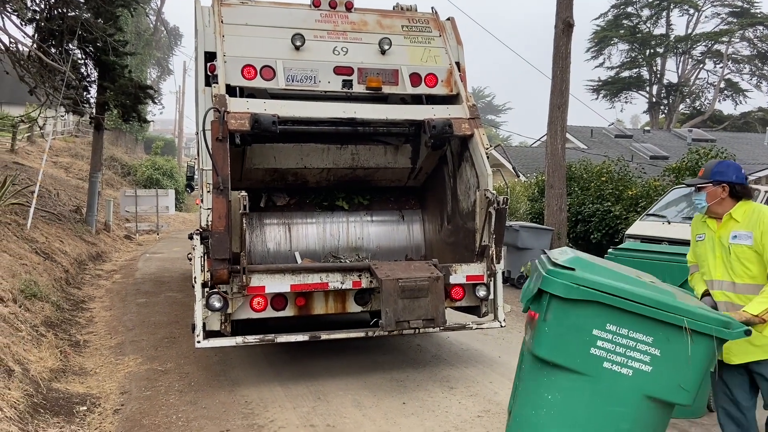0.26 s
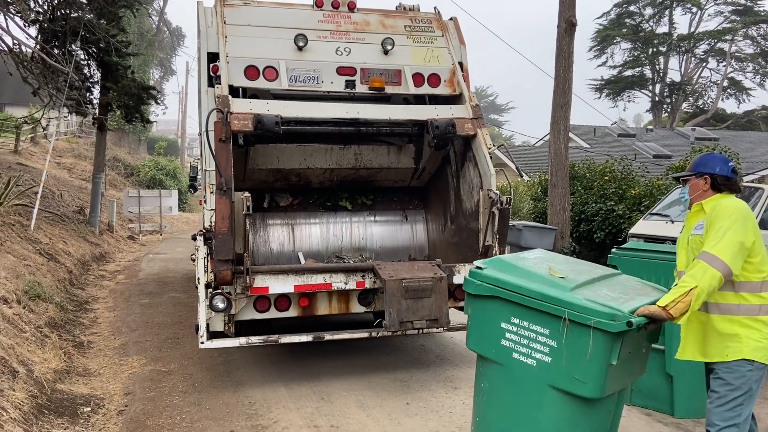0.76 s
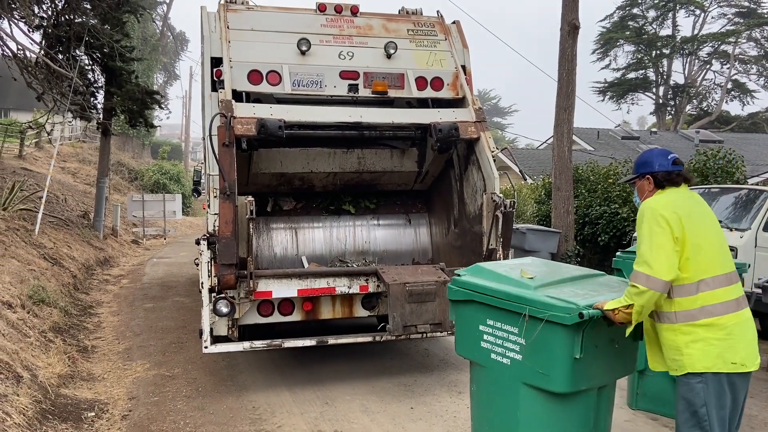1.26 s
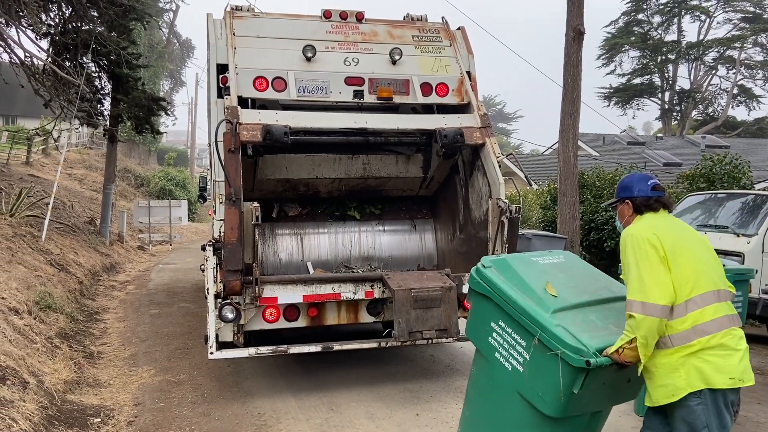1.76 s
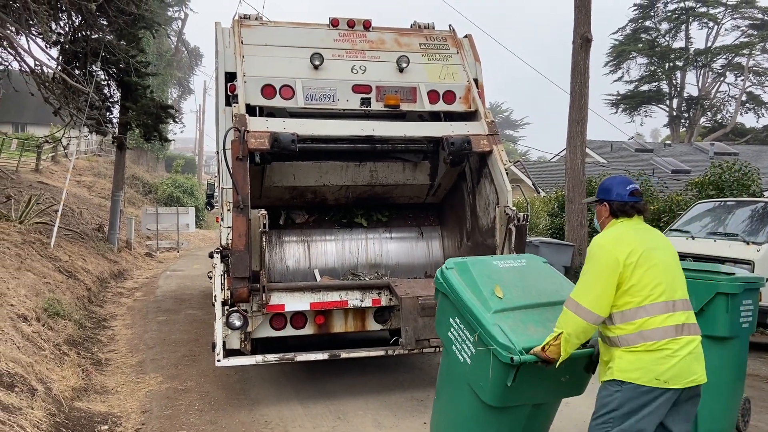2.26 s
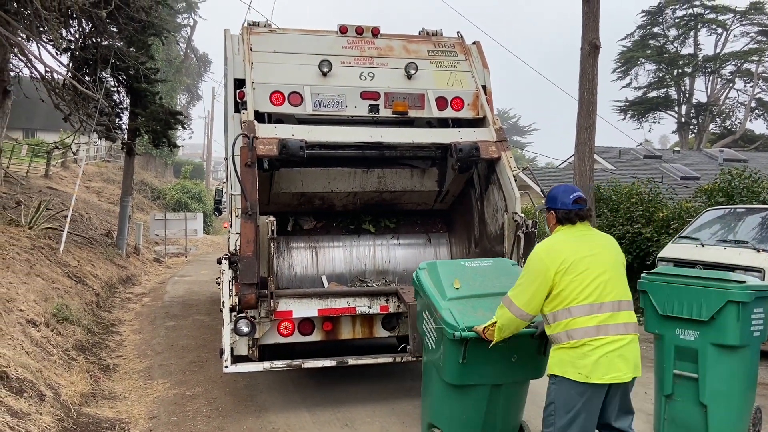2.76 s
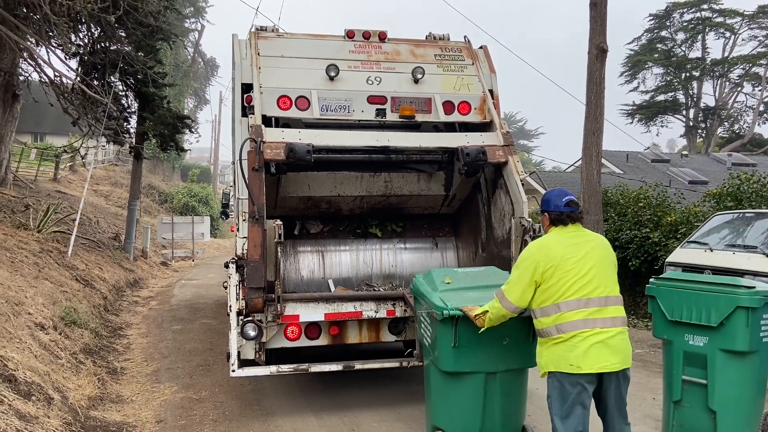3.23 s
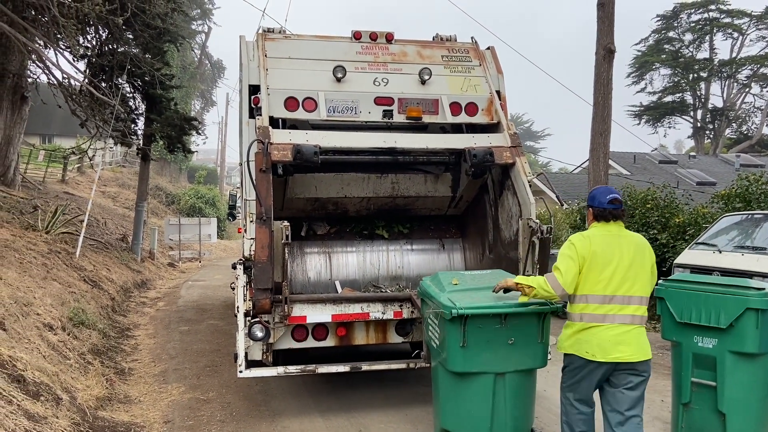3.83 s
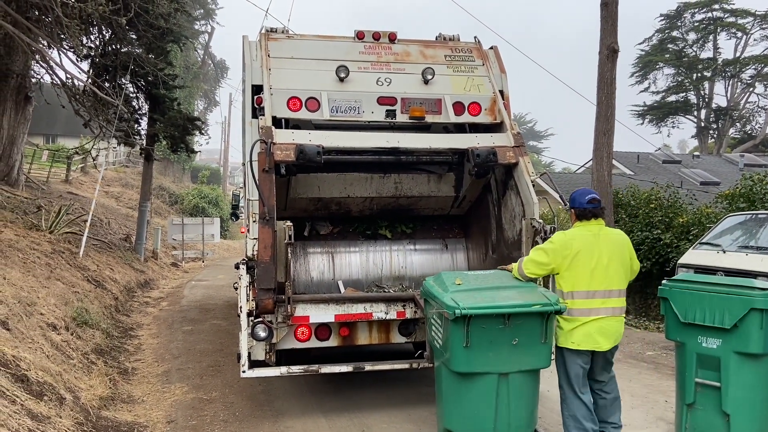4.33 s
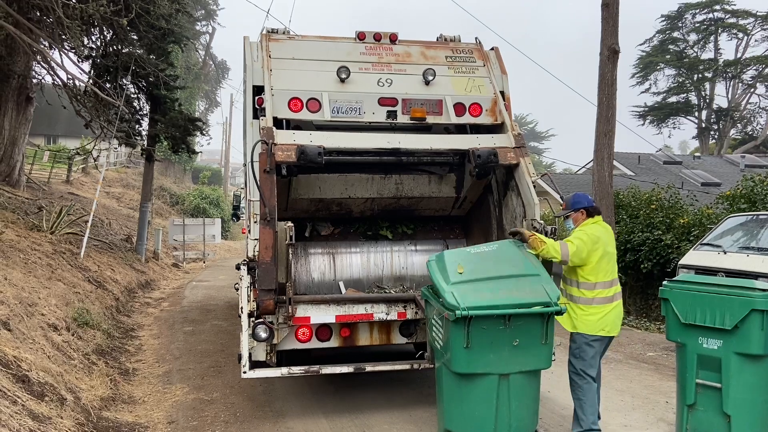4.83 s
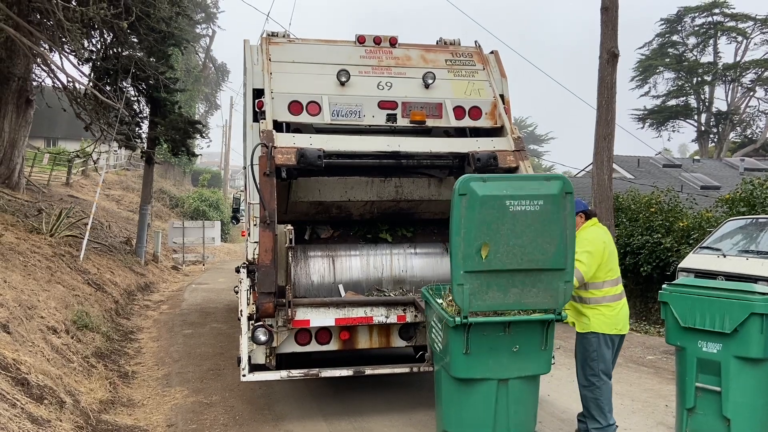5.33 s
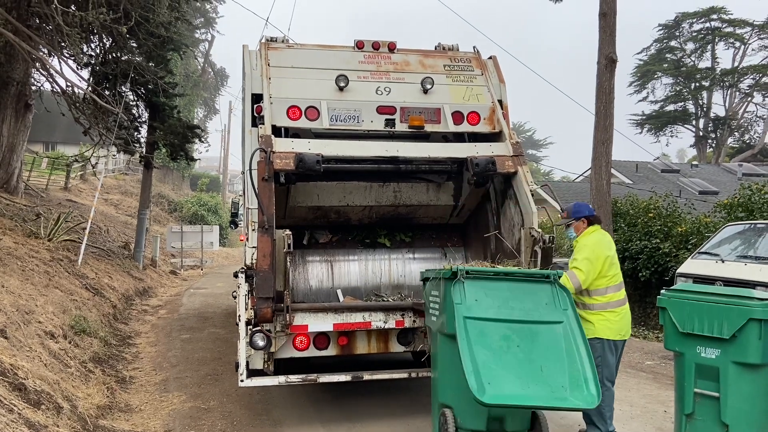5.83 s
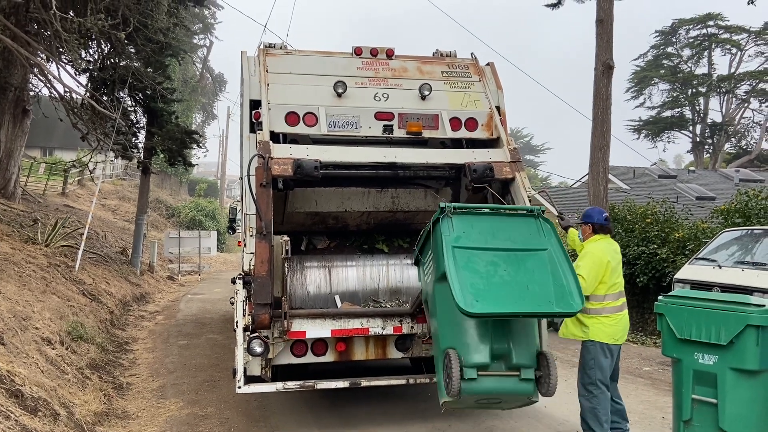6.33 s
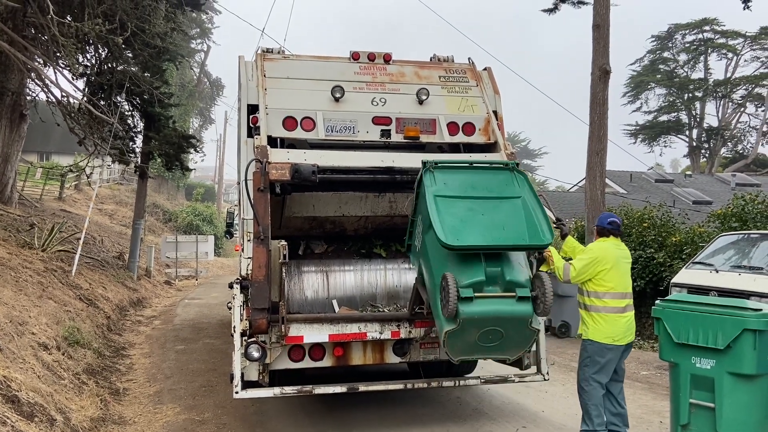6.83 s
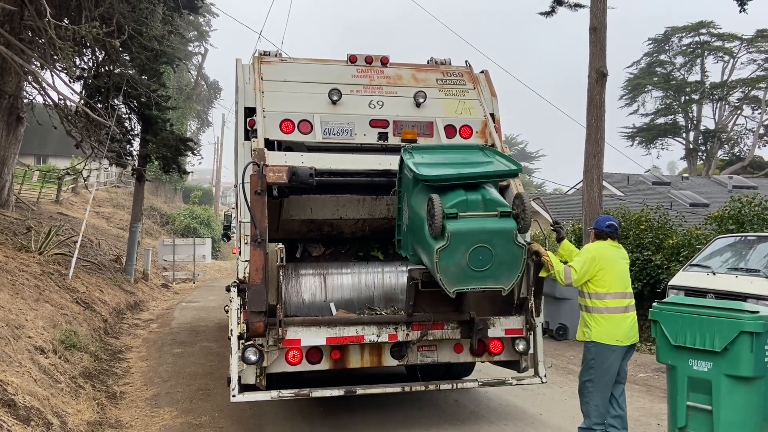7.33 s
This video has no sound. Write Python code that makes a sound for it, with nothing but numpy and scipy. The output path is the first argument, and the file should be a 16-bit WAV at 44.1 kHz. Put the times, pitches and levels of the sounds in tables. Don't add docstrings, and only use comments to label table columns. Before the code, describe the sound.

Close outdoors on a narrow street, a large diesel idles with uneven throb and clatter and a faint bearing squeal. A hollow plastic cart swings and rolls over crackling grit, booms against the truck's lifter, its lid chatters and slams, then it bangs on the steel hopper as refuse slides. A sharp air hiss ends it. Stereo pocket microphone a few metres away.

```python
import sys
import numpy as np
from scipy import signal
from scipy.fft import rfft, irfft, next_fast_len
from scipy.io import wavfile
from scipy.ndimage import uniform_filter1d, map_coordinates

SR = 44100
rng = np.random.default_rng(int(sys.argv[2]) if len(sys.argv) > 2 else 0)


def file_out(sig):
    cols = np.atleast_2d(sig).T
    lim = np.clip(cols, -1, 1)
    pcm = np.round(lim * 32767).astype(np.int16)
    wavfile.write(sys.argv[1], SR, pcm)


def volts_from_decibels(level):
    exponent = np.asarray(level, float) / 20
    return 10 ** exponent


N = 334278
BLOW_SAMPLES = SR // 6

FIRING_HZ = 30.0
LABOURS_S = 5.75

# (strength [dB], ring [Hz])
CYLINDERS = [(-2.5, 880), (-5.5, 800), (0, 840), (-3, 1020), (-8, 930), (-8, 820)]
CYCLE_DB = [2.5, -1.5, 1.5, 2, -2.5, -2]
# (centre [Hz], width [Hz], level [dB])
PIPE = [(62.4, 8.9, 0.5), (113, 18.6, 1.5), (167, 37, -11.5), (193.6, 12, -5), (282, 31, -8.5),
        (343, 33, -9.5)]
# (multiple of the firing rate, rms level [dB])
ENGINE_TONES = [(1, -52), (1.98, -37.5), (3.05, -45), (3.76, -39), (5.18, -43.5), (6.65, -41), (7.36, -49),
                (8.33, -49), (9.33, -48), (10, -51), (11.3, -52), (13.3, -53)]
# (frequency [Hz], density [dB per Hz])
RUMBLE = [(12, -60), (24, -32), (49, 1.5), (86, 1), (108, -1.5), (172, -7), (206, -4), (226, -5.5),
          (345, -9.5), (520, -33.5), (680, -50), (1140, -120)]
# (frequency [Hz], density [dB per Hz])
CLATTER = [(260, -22.5), (450, -9.5), (531, -8.5), (860, -6.5), (985, -7.5), (1700, -17.5), (2000, -17.5),
           (2750, -22), (3820, -23.5), (5330, -33), (7100, -37), (9000, -43), (11000, -70)]
# (ring [Hz], level [dB])
TAPPET = [(1600, -8.5), (2050, -11), (1250, -11)]
# (time [s], level over idle [dB])
EFFORT = [(0.0, 1.5), (0.29, 0), (1.56, 0), (2.09, 1), (2.28, 4.5), (2.47, 1.5), (2.72, -1), (2.95, 0),
          (3.12, 3), (3.55, 2.5), (3.8, .5), (5.05, 0), (5.57, 2.5), (6.12, 2.5), (6.65, 2.5), (7.3, 2.5),
          (7.58, 3)]
# (frequency [Hz], density [dB per Hz])
AIR = [(4000, -34), (6000, 1), (7500, 1), (9000, -5), (12000, -7), (15500, -11), (16500, -25)]
# (time [s], level over still air [dB])
BREEZES = [(0.05, 7), (0.45, 5), (2.28, 6), (3.05, 6), (3.35, 3), (4.15, 8), (4.7, 1.5), (5.6, 3), (6.3, 7),
           (6.7, 8), (7.05, 8), (7.35, 6)]
# (centre [Hz], width [Hz], level [dB])
BEARING = [(3780, 190, 0), (4390, 70, 0)]

# (time [s], peak [dB],
# low ring [dB])
GRIT = [(0.0584, -17, -11), (0.0657, -23, -8), (0.0897, -24.5, -16), (0.1174, -32, -8.5),
        (0.2047, -32.5, -6), (0.2374, -35, -8), (0.263, -27.5, -6), (0.3, -32, -8),
        (0.3416, -23, -14), (0.474, -32, -10), (0.487, -31.5, -12), (0.5761, -35, -7),
        (0.6367, -28, -15), (0.7444, -30, -3), (0.7684, -30.5, -6), (0.819, -21, -13.5),
        (0.8485, -29, -9), (0.8697, -19.5, -8.5), (0.8817, -15, -14), (1.0094, -37, 3),
        (1.552, -33, -6), (1.6059, -18, -10), (1.6436, -31, -4.5), (1.6621, -31, -11),
             (1.7195, -28, 0.5), (1.7644, -27, -8), (1.816, -33, -11), (1.8364, -13.5, -25),
             (1.8898, -2.5, -8), (1.9014, -15, -18), (1.961, -21, -14), (1.9876, -21, -7), (2.053, -31, -2),
             (2.1056, -20.5, -14), (2.1234, -25, -17), (2.1617, -11, -12), (2.1755, -11, -17),
             (2.1954, -13.5, -8), (2.2154, -16.5, -23), (2.2586, -15, -18), (2.3742, -28, 4),
             (2.4366, -11, -17), (2.6369, -19, -15), (2.6724, -19.5, -23), (2.7588, -25, -22),
             (2.8163, -10.5, -15), (2.8923, -14, -15), (2.928, -24, -20)]
# (time [s], peak [dB])
SPLINTERS = [(.1351, -39), (.18, -39), (.3095, -37), (.3994, -41), (.5814, -40), (.618, -38), (.6818, -38),
             (.9044, -36), (.9507, -42), (1.0465, -44), (1.1762, -45), (1.7025, -39), (2.1104, -26),
             (2.1864, -26), (2.2264, -29), (2.2654, -28), (2.2824, -32), (2.395, -42), (2.5591, -42),
             (2.6135, -37), (2.6444, -38), (2.7726, -33), (2.8025, -32), (2.8444, -34), (2.8844, -32),
             (3.0215, -29), (3.0355, -21), (3.3019, -33), (3.5473, -43)]
# (frequency [Hz], density [dB per Hz])
CRACK = [(1470, -8), (2500, -7.5), (4740, -3.5), (6010, -9), (6980, -7), (9000, -8), (12000, -13),
         (15000, -14.5), (16500, -33)]
# (time [s], wall [dB], panel ring [Hz], slap [dB])
BUMPS = [(0.063, -21.5, 950, -40), (1.757, -20, 840, -44), (2.201, -19, 830, -43), (2.262, -22, 829, -40),
         (2.297, -17.5, 740, -35), (2.938, -7, 450, -40), (2.985, -12, 600, -29), (2.993, -7, 700, -27),
         (3.012, -7, 810, -27), (3.034, -14, 797, -19), (3.061, -8, 735, -40), (3.089, -15, 754, -39),
         (3.265, -26, 700, -38), (3.297, -17, 583, -31), (3.326, -15, 1044, -27)]
# (time [s], wall [dB], panel ring [Hz], slap [dB])
BLOWS = [(5.311, -16, 738, -34), (5.339, -13, 810, -33), (5.389, -19.5, 1214, -38), (5.421, -19, 770, -37),
         (5.445, -19, 820, -42), (5.595, -11.5, 767, -25), (5.608, -8.5, 820, -30),
         (5.629, -14.5, 681, -32), (5.975, -18, 700, -30), (6.019, -25, 890, -29.5),
         (6.174, -19.5, 975, -40), (6.58, 2.5, 776, -14), (6.599, -13, 1780, -36), (6.619, -11, 1420, -22),
         (6.648, -14, 1400, -34), (6.902, -14, 813, -28.5), (6.919, -6, 930, -27), (6.955, -15, 1100, -38),
         (7.11, -24, 1400, -42), (7.139, -16, 1150, -36), (7.178, -24, 1300, -44), (7.235, -24, 900, -40),
         (7.489, -4, 843, -16.5)]
# (time [s], wall [dB], panel ring [Hz], slap [dB])
SLAMS = [
    (0.882, -8, 1380, -15),
    (3.141, -11, 800, -30),
    (5.743, -14.5, 1234, -55),
    (5.946, 2.5, 998, -12.5),
    (5.949, -1, 560, -40),
    (5.953, -1, 380, -18),
    (6.571, -4.5, 1290, -16),
    (7.42, -3.5, 850, -33),
]
# (centre [Hz], width [Hz], level [dB])
WALL = [(358, 84, -8), (632, 78, -3), (790, 60, 0), (898, 120, -4), (1250, 210, -6.5), (1700, 350, -11.5),
        (2200, 730, -18)]
# (frequency [Hz], density [dB per Hz])
SLAP = [(1200, -9), (1900, 1), (2500, 2), (4000, -6), (6100, -11.5), (9000, -10), (12000, -21),
        (16500, -34)]
# (time [s], level [dB], low swing [Hz], upper swing [Hz])
BOOMS = [(0.063, -10.5, 113, 276), (0.879, -11.5, 93.5, 400), (1.76, -12, 125, 194), (1.91, -19, 64.6, 317),
         (2.188, -13, 92, 248), (2.347, -13.5, 58.5, 183), (2.609, -13, 128, 163), (2.948, -6.5, 90.6, 147),
         (2.988, -7, 128, 156), (3.04, -5.5, 75, 154), (3.061, -9.5, 67, 106), (3.311, -11, 58, 118),
         (3.334, -13, 73.4, 278), (4.969, -20, 61.9, 205), (5.319, -12, 200, 285), (5.339, -9.5, 94, 189),
         (5.389, -14, 75.4, 270), (5.439, -11, 64.6, 166), (5.619, -12, 93, 200), (5.66, -17, 93, 200),
         (5.945, -5.5, 200, 380), (6.055, -20, 250, 255), (6.581, -9, 91.5, 374), (6.629, -12.5, 59.2, 246),
         (6.929, -13, 78, 267), (7.049, -19, 96.9, 225)]
# (centre [Hz], width [Hz], level [dB])
FLOOR = [(202, 73, 0), (292, 92, 0.5), (415, 110, -4.5)]
# (time [s], drumming [dB], grit [dB])
ROLL = [
    (1.3, -38, -65),
    (1.644, -45, -67),
    (1.676, -31, -67),
    (2.058, -35, -44.5),
    (2.412, -26, -52),
    (2.904, -36, -42),
    (2.95, -32, -39),
]
# (centre [Hz], width [Hz], level [dB])
CART_AIR = [(68, 26.4, -0.5), (97.6, 23.2, -0.5), (204.5, 47, -3.5), (285, 78, -3)]

# (time [s], level [dB])
SLIDE = [(3.36, -50), (3.56, -36), (3.7, -55), (4.95, -60), (5.08, -45), (5.2, -56), (6.1, -52),
         (6.35, -41), (6.5, -46), (6.8, -42), (7.06, -47), (7.16, -38), (7.24, -39), (7.29, -48),
         (7.36, -39), (7.58, -42)]
# (centre [Hz], width [Hz], level [dB])
CHUTE = [(370, 60, 6), (600, 200, 0), (800, 220, 0), (1350, 400, -4), (2100, 600, -10), (3300, 1200, -13)]
# (time [s], peak [dB], low ring [dB], low ring [Hz])
TICKS = [(3.4534, -35, 0, 1500), (4.6838, -36, -4, 1510), (4.7356, -31.5, -12, 1930), (4.994, -30, 6, 1940),
         (5.326, -34, 4, 2300), (5.336, -33, 6, 3050), (5.7404, -36, 17, 1860), (5.9451, -4, -20, 1750),
         (6.0175, -26, -8, 2370), (6.0576, -28, -1, 2620), (6.5719, -11, -8, 2120),
         (6.6232, -19.5, 3, 1890), (6.7753, -34, -8, 1720), (6.901, -21.5, -6, 1490),
         (6.9671, -31, 6, 1650), (7.0743, -36, 1, 2050), (7.488, -20, 9.5, 1995)]
# (centre [Hz], width [Hz], level [dB])
HINGE = [(3480, 770, 2), (4430, 500, 3), (5650, 1300, -4.5), (7500, 2700, -7.5)]
# (frequency [Hz], density [dB per Hz])
JET = [(710, -31), (1200, -11), (3000, -9.5), (5000, -10.5), (7000, -7), (8000, -8), (12000, -19.5),
       (15300, -17), (16500, -44)]
# (centre [Hz], width [Hz], level [dB])
NOZZLE = [(3340, 120, -4), (4120, 180, 0), (4650, 180, -2), (5100, 130, 1), (6130, 160, -4), (6540, 90, -3),
          (6980, 260, 1.5)]

# (frequency [Hz], t60 [s])
STREET = [(150, 0.75), (1000, 0.36), (4000, 0.21), (12000, 0.11)]
# (frequency [Hz], likeness [0 to 1])
ALIKE = [(60, 1.0), (290, .98), (640, .82), (1410, .65), (3100, .7), (6000, .7), (8300, .995)]
# (frequency [Hz], phase [rad])
LEAD = [(100, 0), (1120, -.1), (3100, .6), (5680, -.3), (7000, 0)]
# (frequency [Hz], level [dB])
LEAN = [(60, 2), (300, 1.5), (700, 2.5), (2400, 3), (4400, 4), (6500, 2), (8300, 0)]
# (time [s], gain [dB])
DUCK = [
    (5.98, 2),
    (6.11, -8),
    (6.24, 0.5),
    (6.5, 1),
]


def unit(x):
    return x / np.sqrt(np.mean(x ** 2) + 1e-20)


def along(points, hz):
    f, v = np.transpose(points)
    return np.interp(np.log(hz + 1), np.log(f + 1), v)


def curves(rows, outside=None):
    s, *columns = np.transpose(rows)
    return [np.interp(np.arange(N) / SR, s, column, outside, outside) for column in columns]


def since_s(start):
    return np.arange(N) / SR - start


def noise():
    return rng.standard_normal(N)


def wobble(rate):
    return map_coordinates(rng.standard_normal(int(N * rate / SR) + 4), [np.arange(N) * rate / SR])


def filtered(x, response):
    m = next_fast_len(N + SR // 4)
    return irfft(rfft(x, m) * response(np.fft.rfftfreq(m, 1 / SR)), m)[..., :N]


def colour(spectrum):
    return lambda hz: unit(volts_from_decibels(along(spectrum, hz)))


def modes(table):
    def response(f):
        total = 0
        for k, (centre, width, db) in enumerate(table):
            damping = 1j * f * width
            total = total + (-1) ** k * volts_from_decibels(db) * damping / (centre ** 2 - f ** 2 + damping)
        return total / np.sqrt(np.mean(abs(total) ** 2))
    return response


def widened(pair, gain):
    turn = lambda hz: np.arccos(np.clip(along(ALIKE, hz), -1, 1)) / 2
    mid, side = filtered(pair, lambda hz: gain(hz) * [np.cos(turn(hz)), np.sin(turn(hz))])
    return np.array([mid + side, mid - side])


def rush(spectrum, patchy_db):
    z = signal.stft(rng.standard_normal((2, N)), nperseg=512)[2]
    patches = uniform_filter1d(rng.standard_normal(z.shape[1:]), 5, 0)
    patches = uniform_filter1d(patches, 10, 1)
    pair = signal.istft(z * volts_from_decibels(patchy_db * unit(patches)), nperseg=512)[1][:, :N]
    return unit(widened(pair, lambda hz: volts_from_decibels(along(spectrum, hz))))


def placed(times, pans, sounds):
    out = np.zeros((2, N + SR))
    for s, pan, sound in zip(times, pans, sounds):
        out[:, round(s * SR):][:, :len(sound)] += volts_from_decibels([[pan / 2], [-pan / 2]]) * sound
    return out[:, :N]


def dying(db, t60, rise, spike_db=-60):
    t = np.arange(BLOW_SAMPLES) / SR
    spike = 1 + volts_from_decibels(spike_db - 60 * t / 0.01)
    return (1 - np.exp(-t / rise)) * volts_from_decibels(db[:, None] - 60 * t / t60[:, None]) * spike


def rings(hz):
    turns = hz[:, None] * np.arange(BLOW_SAMPLES) / SR
    return np.sin(2 * np.pi * (turns + rng.random((len(hz), 1))))


def hissing(envelopes):
    return envelopes * rng.standard_normal(envelopes.shape)


def labouring():
    return np.clip(since_s(LABOURS_S) / .3, 0, 1)


def engine():
    effort_db, = curves(EFFORT)
    turns = 6 + since_s(.012) * FIRING_HZ + wobble(1.5) / 30
    which = turns.astype(int)
    cylinder = which % len(CYLINDERS)
    strength_db, ring_hz = np.array(CYLINDERS)[cylinder].T
    size = volts_from_decibels(strength_db + 1.1 * rng.standard_normal(N // 100)[which])

    exhaust = unit(filtered(size * np.diff(which, prepend=5), modes(PIPE)))
    tones = 0
    for multiple, db in ENGINE_TONES:
        tones = tones + np.sqrt(2) * volts_from_decibels(db + 1.8 * wobble(6.7)) * np.sin(2 * np.pi * multiple * turns)
    throb = volts_from_decibels(-12) * exhaust + volts_from_decibels(-2.0) * rush(RUMBLE, patchy_db=0.9) + volts_from_decibels(28.5) * tones

    since = turns % 1 / FIRING_HZ
    loose = (cylinder == 0) * sum(volts_from_decibels(db) * np.sin(2 * np.pi * hz * since) for hz, db in TAPPET)
    burn = size * since * np.exp(-since / .0065)
    rough = 1 + .35 * wobble(330)
    knock = unit(burn * rough * (np.sin(2 * np.pi * ring_hz * since) + loose))
    knock_db = -5 - 11 * labouring()
    cycle_db = uniform_filter1d(np.array(CYCLE_DB)[cylinder], size=400)
    rattle = volts_from_decibels(-0.5 + .8 * wobble(7.8) + cycle_db) * rush(CLATTER, patchy_db=1.0)
    clatter = volts_from_decibels(knock_db) * knock + rattle
    clatter_db = -41.2 + 1.2 * effort_db
    return volts_from_decibels(-31.5 + effort_db) * throb + volts_from_decibels(clatter_db) * clatter


def breeze():
    half_length_s = .18
    puffs_db = sum(db * np.exp(-(since_s(s) / half_length_s) ** 2) for s, db in BREEZES)
    return volts_from_decibels(-64 + puffs_db + 2.4 * wobble(14)) * rush(AIR, patchy_db=3.0)


def pump():
    swell = np.cos(np.pi * FIRING_HZ / 6 * since_s(.092)) ** 6
    flutter = volts_from_decibels(8 * swell + 2.2 * wobble(11) + 1.5 * wobble(3))
    squeal, whistle = (unit(filtered(noise(), lambda f: modes([m])(f) ** 2)) for m in BEARING)
    squeal_db = -66 - 5 * (since_s(LABOURS_S) > 0)
    return volts_from_decibels(squeal_db) * flutter * squeal + volts_from_decibels(-68 + 3 * wobble(4)) * whistle


def cracks(s, db, low_db, low_hz, t60):
    t60 = np.clip(t60, .012, .2)
    pick = rng.standard_normal((3, len(s)))
    pan = .8 * pick[2]
    fizz = hissing(dying(db - 17, t60, rise=0.0009, spike_db=15))
    stone = rings(4900 + 400 * pick[0]) + rings(6900 + 500 * pick[1])
    stone = dying(db - 10, 0.18 * t60, rise=0.0009) * stone
    low = rings(low_hz) + 0.3 * rings(1.24 * low_hz)
    low = dying(db + low_db - 5, 0.015 + 0.29 * t60, rise=0.00037) * low
    return filtered(placed(s, pan, fizz), colour(CRACK)) + placed(s, pan, low + stone)


def grit():
    s, db, low_db = np.transpose(GRIT)
    return cracks(s, db, low_db, low_hz=2130 + 28 * db, t60=.085 + .0012 * db)


def knocks(rows, ring_s):
    s, wall_db, hz, slap_db = np.transpose(rows)
    t60 = ring_s + 0 * s
    pan = 1.0 * rng.standard_normal(len(s))
    shake = hissing(dying(wall_db - 9.5, t60, rise=.003))
    slap = hissing(dying(slap_db - 2.5, 0.61 * t60, rise=0.0022, spike_db=7))
    panel = dying(wall_db - 5.5, 0.7 * t60, rise=0.0015) * rings(hz)
    wall = filtered(placed(s, pan, shake), modes(WALL))
    return wall + placed(s, pan, panel) + filtered(placed(s, pan, slap), colour(SLAP))


def booms():
    s, db, low_hz, upper_hz = np.transpose(BOOMS)
    swing = rings(low_hz) + volts_from_decibels(-3.5) * rings(upper_hz)
    t60 = np.clip(11 / low_hz, .06, .14)
    fade = dying(db - 3.0, t60, rise=0.005)
    rumble = filtered(placed(s, 0 * s, hissing(fade))[0], modes(FLOOR))
    return placed(s, 0 * s, fade * swing) + volts_from_decibels(-10) * rumble


def splinters():
    s, db = np.transpose(SPLINTERS)
    return cracks(s, db + 3, low_db=-22 + 0 * s, low_hz=2000 + 0 * s, t60=.03 + 0 * s)


def wheels():
    drum_db, grit_db = curves(ROLL, outside=-120)
    drumming = unit(filtered(volts_from_decibels(5 * wobble(22.08)) * noise(), modes(CART_AIR)))
    grain_db = 5.2 * np.minimum(rng.exponential(size=N), 2.4) + 3.4 * wobble(30.46)
    grains = (rng.random(N) < .012) * volts_from_decibels(grain_db) * noise()
    fizz = unit(filtered(grains, colour(CRACK)))
    return volts_from_decibels(drum_db - 5.0) * drumming + volts_from_decibels(grit_db - 3.5) * fizz


def refuse():
    level_db, = curves(SLIDE, outside=-120)
    grains = (rng.random(N) < .02) * volts_from_decibels(2.5 * wobble(35)) * noise()
    return volts_from_decibels(level_db) * unit(filtered(grains, modes(CHUTE)))


def ticks():
    s, db, low_db, low_hz = np.transpose(TICKS)
    return cracks(s, db, low_db, low_hz, t60=.08 + 0 * s)


def hose():
    resonance = modes([(365, 45, 0)])
    hum = unit(filtered(noise(), lambda f: resonance(f) ** 2))
    fade_in = np.clip(since_s(LABOURS_S) / .3 + 1, 0, 1)
    return volts_from_decibels(-44 + 2.5 * wobble(6)) * fade_in * hum


def lid():
    t = since_s(5.593)
    rattle_db = -30 + np.minimum(5000 * t, -150 * t)
    rattle_db = rattle_db - 500 * np.maximum(t - .05, 0)
    return volts_from_decibels(rattle_db + 2.2 * wobble(150)) * unit(filtered(noise(), modes(HINGE)))


def valve():
    t = since_s(7.402)
    hiss_db = -25.5 + np.minimum(2000 * t, -15 * t)
    singing = lambda f: volts_from_decibels(-2.5) * unit(abs(modes(NOZZLE)(f)) ** 2)
    jet = widened(rng.standard_normal((2, N)), lambda f: np.hypot(colour(JET)(f), singing(f)))
    return volts_from_decibels(hiss_db) * unit(jet)


def street(x):
    hz, t, z = signal.stft(rng.standard_normal((2, SR // 2)), SR, nperseg=256)
    tail = signal.istft(z * volts_from_decibels(-60 * t / along(STREET, hz)[:, None]), SR, nperseg=256)[1]
    tail = tail / np.linalg.norm(tail[0])
    delayed = np.pad(x.mean(0), (400, 0))[None]
    echo = signal.fftconvolve(delayed, tail, axes=1)[:, :N]
    return widened(echo, np.ones_like)


def scene():
    free_t60, pressed_t60 = .1, .048
    hits = grit() + knocks(BUMPS + BLOWS, free_t60) + knocks(SLAMS, pressed_t60) + booms()
    hits = hits + splinters() + refuse() + ticks() + lid()
    steady = engine() + breeze() + pump() + wheels() + hose() + valve()
    return steady + hits + volts_from_decibels(-14) * street(hits)


def roll_off(x):
    return signal.sosfilt(signal.butter(12, 16830, fs=SR, output="sos"), x)


def record(dry):
    lead = lambda hz: along(LEAD, hz) - 2 * np.pi / 4200 * np.maximum(hz - 6900, 0)
    port = lambda hz: volts_from_decibels(along(LEAN, hz) / 2) * np.exp(.5j * lead(hz))
    ports = lambda hz: (hz < 16800) * np.array([port(hz), 1 / port(hz)])
    heard = volts_from_decibels(curves(DUCK)[0]) * filtered(dry, ports)
    rounded = heard / (1 + abs(heard / .92) ** 6) ** (1 / 6)
    return roll_off(rounded)


dry = scene()
out = record(dry)
file_out(out)
```